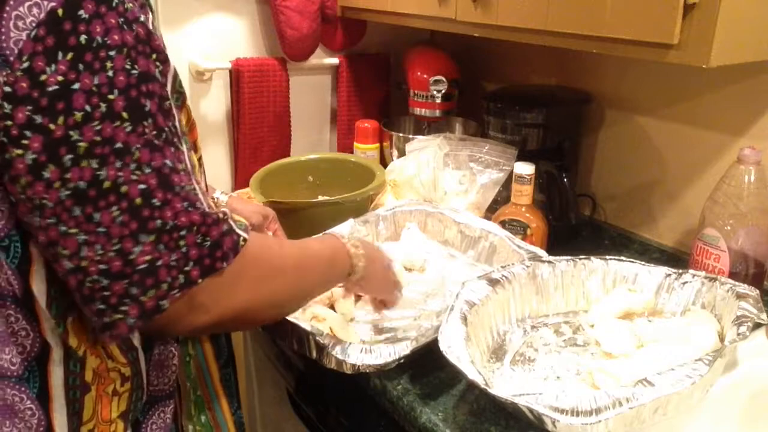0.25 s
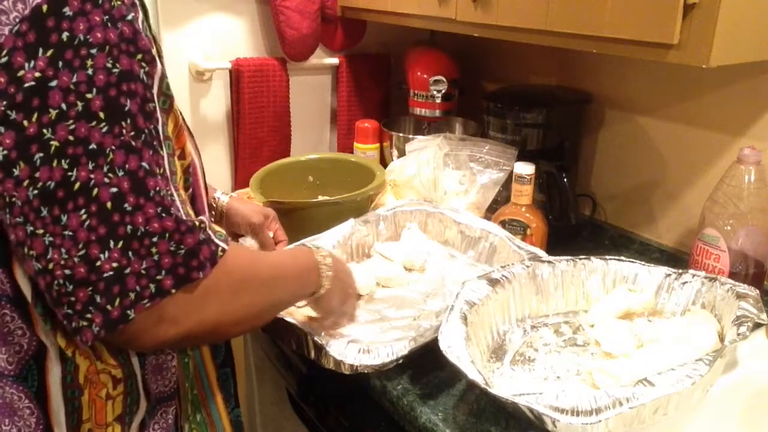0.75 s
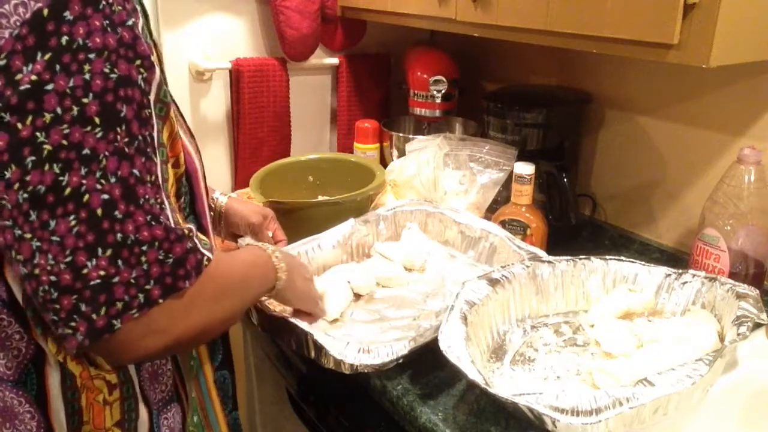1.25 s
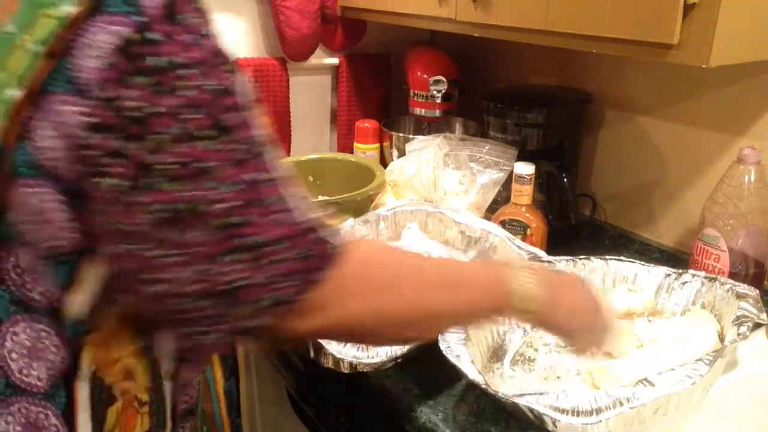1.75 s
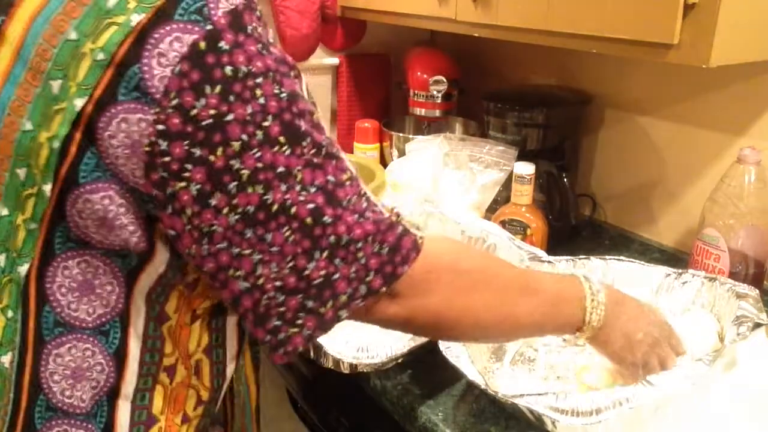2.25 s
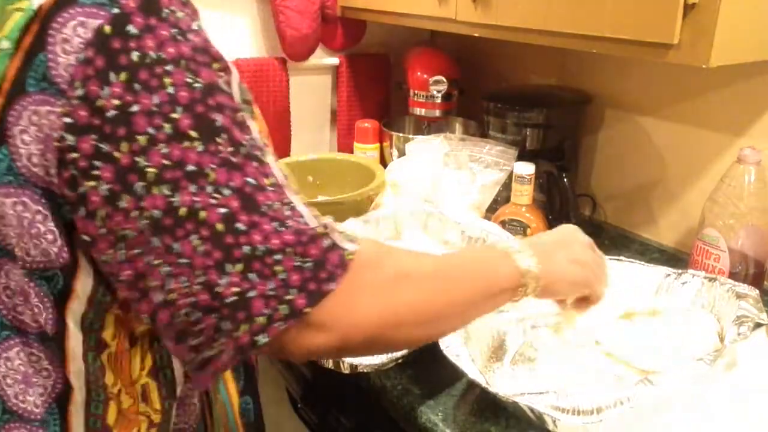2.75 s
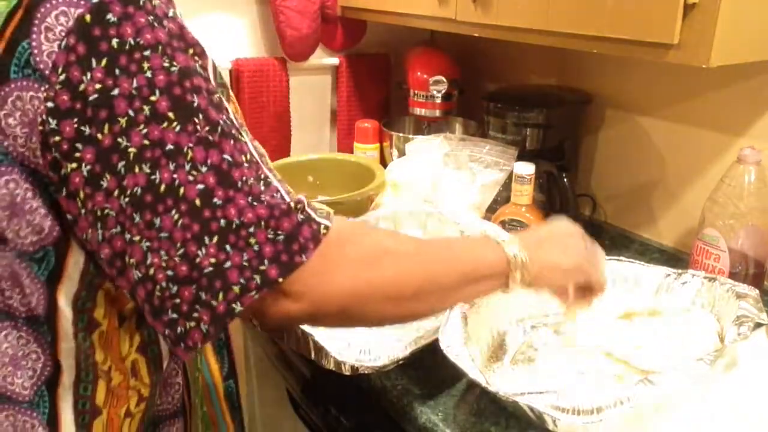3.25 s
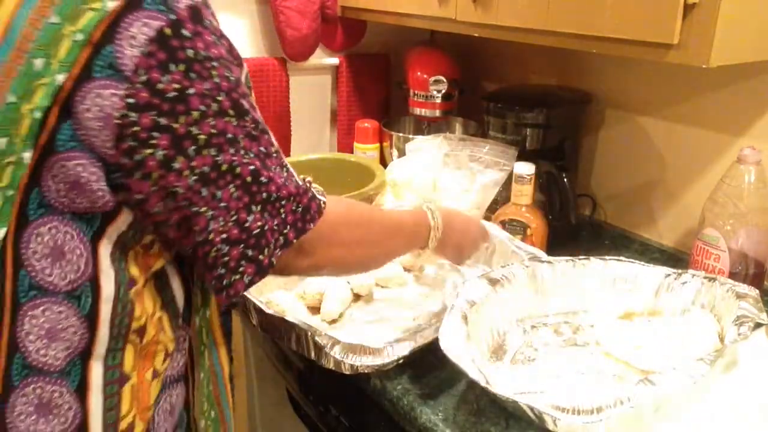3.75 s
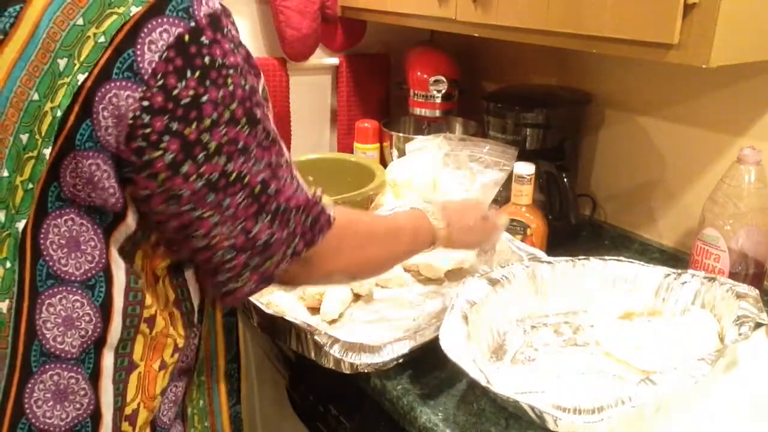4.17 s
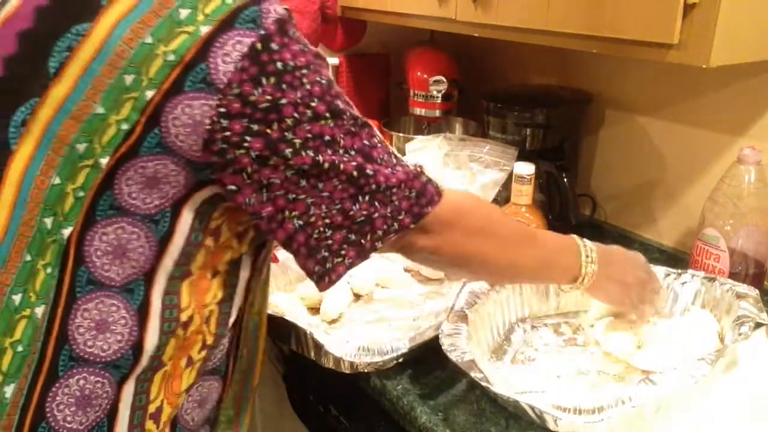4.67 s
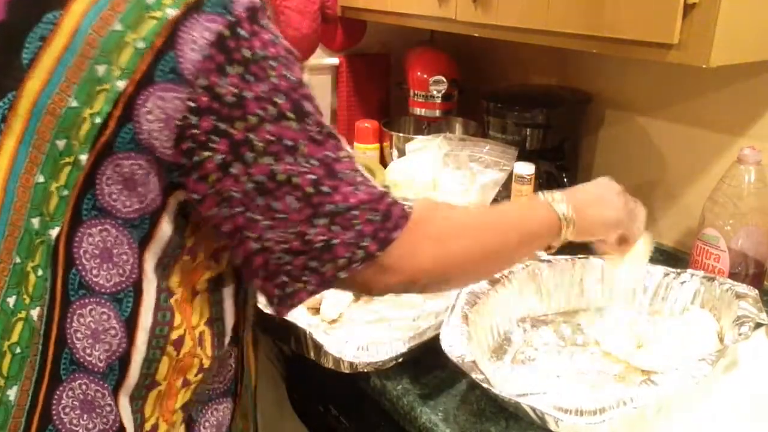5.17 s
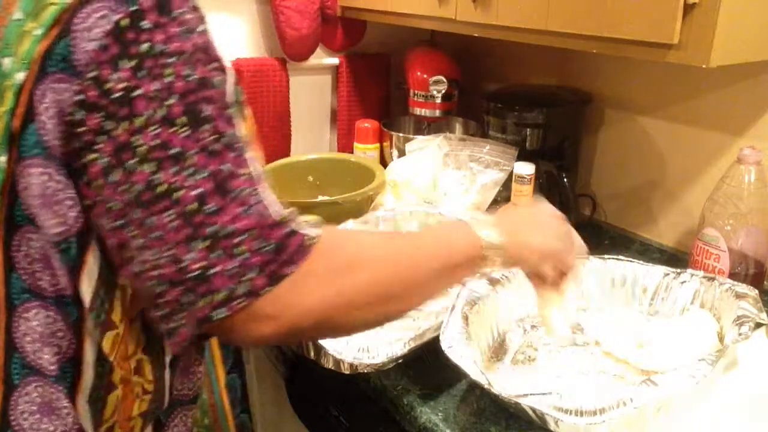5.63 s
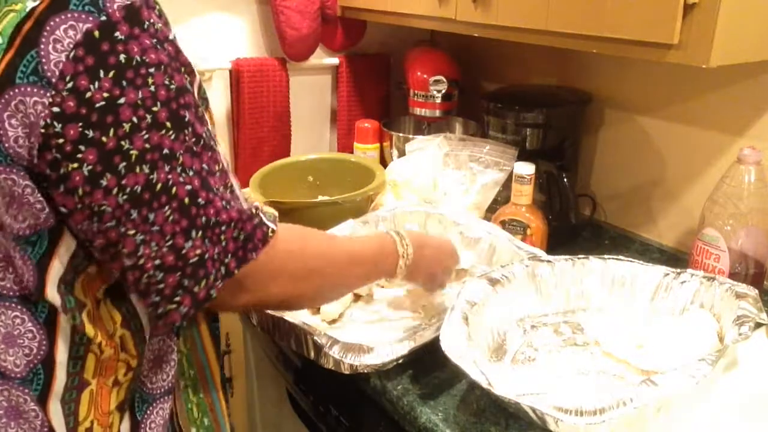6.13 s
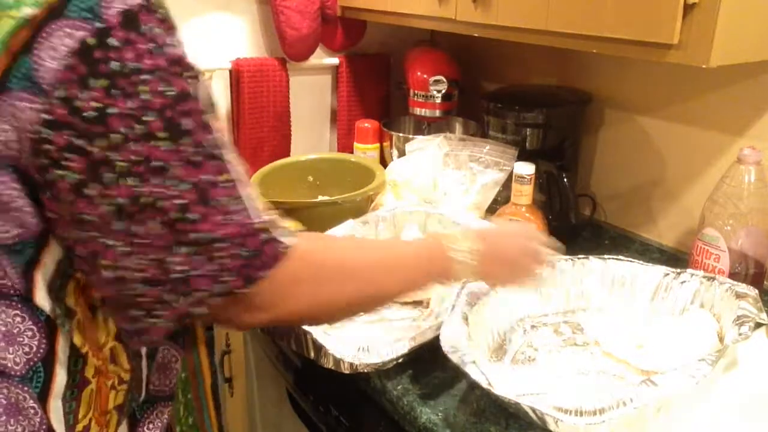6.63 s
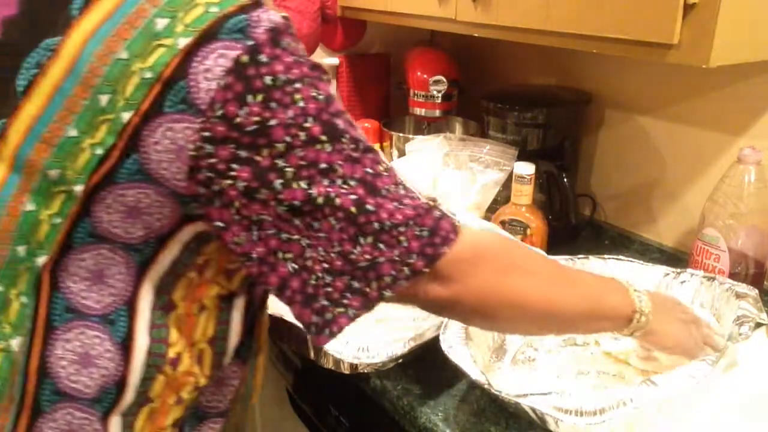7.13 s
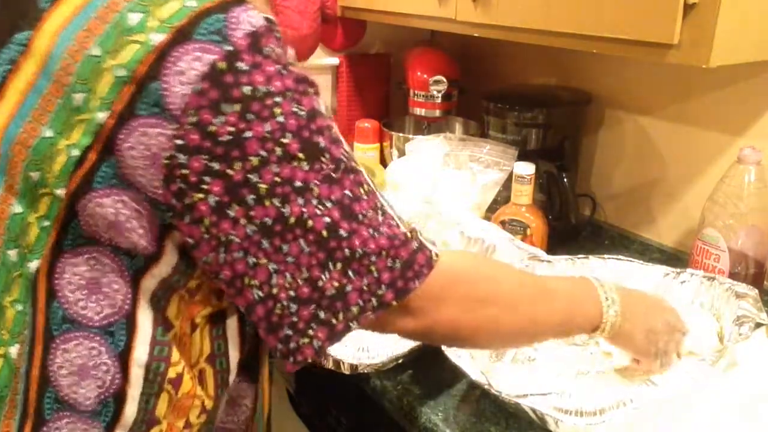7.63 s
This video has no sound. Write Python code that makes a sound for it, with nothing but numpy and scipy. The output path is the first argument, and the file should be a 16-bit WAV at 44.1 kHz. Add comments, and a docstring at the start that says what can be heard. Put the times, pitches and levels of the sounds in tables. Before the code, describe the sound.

Floured food is moved between flimsy aluminum pans: soft crackles, a single sharp clank, dull thuds and faint bangle jingles above a quiet motor hum.

```python
"""Kitchen counter: floured pieces of food are picked out of one thin foil pan, shaken off and pressed into another.
Each touch is gated noise and snaps in bands of foil; one hard knock and its rebounds ring the pan's modes.
Fingers and food swish over the ribs, flour patters, the pan floor thuds, light tinks and bangles ring.
An appliance hums and whines over moving air in the small room; both channels are alike."""
import sys
import numpy as np
from scipy import signal
from scipy.fft import rfft, irfft, next_fast_len
from scipy.io import wavfile

SR = 44100
rng = np.random.default_rng(int(sys.argv[2]) if len(sys.argv) > 2 else 0)


def unload_audio(sound):
    """Save the sound as a 16-bit wav file, at the path given as the first command line argument."""
    columns = np.transpose(np.atleast_2d(sound))
    # keep every value between -1 and 1, then stretch to whole-number steps
    steps = np.round(np.clip(columns, -1, 1) * 32767)
    wavfile.write(sys.argv[1], SR, steps.astype(np.int16))


N = 348390
TIME = np.arange(N) / SR

# food and fingers touch the foil; hardness: padded (< 0) to crisp, weight: brush on the wall to drop on the floor
# start_s, rise_s, level_db, hardness_db, weight_db
TOUCHES = [(.003,0.004,-32.5,-8,-10.5), (.219,0.0052,-42.5,-7,12.5), (.591,.008,-28.5,-1.5,6.5),
           (1.177,0.013,-25,2,2), (1.618,0.0046,-32.5,4,14), (1.6273,0.0044,-9,0,-4),
           (1.6353,0.0021,-15,13,9.5), (1.651,0.005,-15.5,-16,-3), (1.925,.004,-31.5,-8,1.5),
           (1.942,0.0092,-22,-4,-2.5), (2.006,0.0055,-30.5,-5,-8), (2.192,0.0064,-35.5,-27,0),
           (2.721,0.016,-39.5,1,1.5), (2.774,0.013,-37,4.5,-10), (2.848,0.011,-36,-2,-16),
           (3.029,.009,-46.5,12,0), (3.247,0.016,-38,5.5,3), (3.911,0.0044,-47.5,-11,15.5),
           (3.938,0.0067,-27,-13,3.5), (4.02,0.0129,-27.5,0,-5), (4.085,.012,-37.5,-8,-8),
           (4.402,0.013,-37.5,-28,-8.5), (4.677,0.014,-50,12,0), (4.8664,0.0017,-26,-34,-9.5),
           (5.005,0.0053,-36,-10,4.5), (6.221,0.012,-45,5.5,-9), (6.259,0.015,-24,5.5,-3),
           (6.294,0.0093,-23.5,8,-4.5), (6.438,0.0093,-25.5,8.5,0.5), (6.55,.012,-39.5,3.5,-3),
           (7.094,0.0085,-43.5,-43,13.5), (7.254,.012,-27,-6,3.5), (7.284,0.015,-24,-3,-17),
           (7.601,.008,-27,-8,-27), (7.702,.01,-23,-6,-25)]
# foil colour under a stroke: freq_hz, gain_db
RUB_COLOUR = [(100, -7), (300, 0), (700, 7.5), (1200, 4), (2300, 2), (4500, 1), (6200, -3.5), (8500, -0.5),
              (12000, -5), (15000, -7.5)]
# where body, rattle and crinkle are centred
TOUCH_ZONES_HZ, RUB_ZONES_HZ = [700, 2640, 9150], [720, 2950, 11100]


def from_db(db):
    """Decibels to gain."""
    return 10 ** (np.asarray(db) / 20)


def rms_one(x):
    """Scale to unit power."""
    return x / np.sqrt(np.mean(x ** 2) + 1e-20)


def at_hz(points, hz):
    """Read a spectrum on a log-frequency axis."""
    freqs_hz, levels_db = np.transpose(points)
    return np.interp(np.log(hz), np.log(freqs_hz), levels_db)


def wander(rate_hz, step=20):
    """Low-passed noise of unit power, computed every few samples and joined by lines."""
    n = next_fast_len(N // step + 2)
    lowpass = 1 / (1 + (np.fft.rfftfreq(n, step / SR) / rate_hz) ** 2)
    slow = irfft(rfft(rng.standard_normal(n)) * lowpass, n)
    return np.interp(np.arange(N) / step, np.arange(n), rms_one(slow))


def snaps(per_s, spread_db, hiss):
    """Tiny buckles of uneven size at random moments, over the hiss of finer ones."""
    sizes = from_db(spread_db * np.minimum(rng.exponential(1, N), 3))
    sizes = sizes * rng.choice([-1, 1], N)
    buckles = rms_one(sizes * (rng.random(N) < per_s / SR))
    return rms_one(buckles + hiss * rng.standard_normal(N))


def contact(level_db, hardness_db, mix_db, top_hz):
    """A harder contact reaches higher, with more crinkle and less body; returns top edge and zone levels."""
    shares = np.array([-0.068, 0, 1])   # dB per dB of hardness
    octaves = hardness_db / 32.5
    return top_hz * 2 ** octaves, level_db + np.array(mix_db) + hardness_db * shares


def strokes(rows, mix_db, top_hz, flatness):
    """Each stroke swells and fades; the flatter it is, the longer it holds its force."""
    gestures = []
    for centre_s, half_s, level_db, hardness_db in rows:
        start = max(int((centre_s - 4 * half_s) * SR), 0)
        stop = int((centre_s + 4 * half_s) * SR)
        force = np.exp(-.5 * np.abs((TIME[start:stop] - centre_s) / half_s) ** flatness)
        gestures.append((start, force, *contact(level_db, hardness_db, mix_db, top_hz)))
    return gestures


def foil(gestures, zones_hz, colour, grains, edge_count=23):
    """Gestures (start sample, force, top_hz, zone levels dB) gate grains through the bands of the sheet."""
    edges_hz = np.geomspace(130, 16000, edge_count)
    centres_hz = np.sqrt(edges_hz[:-1] * edges_hz[1:])
    gains = []
    for _, _, top_hz, levels_db in gestures:
        zone_gain = from_db(np.interp(np.log(centres_hz), np.log(zones_hz), levels_db))
        # a padded contact leaves the finest creases still
        gains.append(zone_gain / np.hypot(1, (centres_hz / top_hz) ** 4))
    out = np.zeros(N)
    for k, hz in enumerate(centres_hz):
        power = np.zeros(N)
        for (start, force, *_), gain in zip(gestures, gains):
            power[start:start + len(force)] += (gain[k] * force[:N - start]) ** 2
        band = signal.butter(2, edges_hz[k:k + 2], "band", fs=SR, output="sos")
        gated = np.sqrt(power + 1e-18) * grains[k % 2]
        out += from_db(at_hz(colour, hz)) * signal.sosfilt(band, gated)
    return out


def touches(first_snap=0.73, snap_treble_db=-8, chatter=0.75, chatter_s=0.02, chatter_treble_db=-4):
    """A touch starts with a dull snap, swells brightly as the foil gives way, and chatters out."""
    # foil colour under a touch: freq_hz, gain_db
    touch_colour = [(100, -25.5), (200, -1.5), (330, -3.5), (560, -2.5), (820, 0), (1200, 0.5), (1800, -1),
                    (2500, 1), (4500, 3), (6200, -2), (8300, 6), (12000, -3.5), (15000, -4)]
    mix_db = [8, -1, -13.5]   # body, rattle, crinkle
    t, gestures = TIME[:SR // 4], []
    upward = np.linspace(0, 1, len(TOUCH_ZONES_HZ)) ** 2
    for start_s, rise_s, level_db, hardness_db, weight_db in TOUCHES:
        top_hz, levels_db = contact(level_db, hardness_db, mix_db, top_hz=13500)
        levels_db[0] += weight_db   # weight pushes on the body of the pan
        start = max(round(start_s * SR), 0)
        u = t / max(rise_s, .001)
        snap = first_snap * np.exp(-u)
        swell = 2 * u * np.exp(-u)
        rattle = chatter * (1 - np.exp(-u)) * np.exp(-t / chatter_s)
        gestures.append((start, snap, top_hz, levels_db + snap_treble_db * upward))
        gestures.append((start, swell, top_hz, levels_db))
        gestures.append((start, rattle, top_hz, levels_db + chatter_treble_db * upward))
    grains = [snaps(per_s=2200, spread_db=4.5, hiss=0.46) for _ in range(2)]
    return foil(gestures, TOUCH_ZONES_HZ, touch_colour, grains)


def ring(clicks, hz, t60_s):
    """A damped two-pole resonator: a unit click sets a sine of height 1 ringing."""
    r, w = from_db(-60 / (t60_s * SR)), 2 * np.pi * hz / SR
    return signal.lfilter([0, np.sin(w)], [1, -2 * r * np.cos(w), r * r], clicks + 1e-18)


def knocks(scatter_db=2.0, jitter_s=.0005, rebounds=3):
    """The knock on the counter, its rebounds and the touches strike every mode, each with its own strength."""
    # pan modes: freq_hz, level_db, t60_s
    pan_modes = [(282,-12.5,0.15), (325,-9.5,0.044), (357,-22.5,0.11), (423,-4.5,0.13), (422,-13,0.15),
                 (456,-8.5,0.23), (532,-5,0.04), (596,-20,0.19), (670,-15.5,0.17), (721.5,-10,0.24),
                 (745,-28,0.16), (806,-4.5,0.121), (814,7.5,0.048), (895,-6,0.057), (992,-21.5,0.14),
                 (1000,-10.5,0.043), (1202,-24.5,0.19), (1430,-25.5,0.045), (1510,-15,0.15),
                 (1654,-16,0.12), (1670,-15.5,0.15), (1760,-31,0.079), (1890,-24.5,0.18),
                 (2086,-10.5,0.072), (2253,-14.5,0.011), (2360,-12,0.074), (2460,-16,0.052)]
    knock_s, knock_db = 1.6274, -4
    rebound_gap_s, rebound_db = .009, -17.5
    touch_ring_db = -18   # re touch level plus weight
    blows = [(knock_s, knock_db)]
    for k in range(rebounds):
        blows.append((knock_s + (k + 1) * rebound_gap_s + rng.normal(0, jitter_s), rebound_db))
    for start_s, rise_s, level_db, _, weight_db in TOUCHES:
        blows.append((start_s + rise_s / 2, level_db + weight_db + touch_ring_db))
    times_s, levels_db = np.transpose(blows)
    samples = np.round(times_s * SR).astype(int)
    scatter = rng.normal(0, scatter_db, (len(blows), len(pan_modes)))
    out = np.zeros(N)
    for k, (hz, mode_db, t60_s) in enumerate(pan_modes):
        clicks = np.bincount(samples, from_db(levels_db + mode_db + scatter[:, k]), N)
        out += (-1) ** k * ring(clicks, hz, t60_s)
    return out


def rubs(unevenness_db=1.0):
    """Fingers and food slide over the foil and catch a little on the ribs."""
    # fingers wipe over the ribbed wall: centre_s, half_length_s, level_db, hardness_db
    wall_wipes = [(.015,0.061,-41,-4.5), (.6,0.052,-37.5,1.5), (.748,0.074,-33,8), (1.288,0.048,-38.5,3.5),
                  (7.35,0.049,-42,-12), (7.52,0.053,-39,-16.5), (7.642,0.033,-28,-6), (7.755,0.046,-32,-7)]
    # a piece slides over the pan floor: centre_s, half_length_s, level_db, hardness_db
    floor_drags = [(2.053,.051,-46.5,4.5), (2.24,0.022,-52,6.5), (3.996,0.043,-39.5,-8),
                   (4.153,0.1,-56.5,-4), (4.987,0.045,-44.5,-0.5), (7.22,0.039,-46.5,4.5)]
    gestures = strokes(wall_wipes, mix_db=[-11.5, -1.5, -5.5], top_hz=10970, flatness=3.43)
    gestures += strokes(floor_drags, mix_db=[7, -1.5, -5.5], top_hz=13500, flatness=2.1)
    catch = from_db(unevenness_db * wander(45))
    grains = [catch * snaps(per_s=1800, spread_db=2.0, hiss=0.71) for _ in range(2)]
    return foil(gestures, RUB_ZONES_HZ, RUB_COLOUR, grains)


def flour():
    """Pieces are shaken; crumbs of coating patter on the foil over the hiss of fine flour."""
    # shakes: centre_s, half_length_s, level_db, hardness_db
    shakes = [(2.41,0.037,-60,5), (2.89,0.041,-49.5,8.5), (3.08,0.082,-51,3.5), (4.5,0.044,-64.5,7.5),
              (5.376,.028,-56.5,6), (5.513,0.086,-54,5), (5.665,0.039,-51,-11), (6.808,.03,-69,11)]
    gestures = strokes(shakes, mix_db=[7.5, 5, 1.5], top_hz=17000, flatness=2.3)
    crumbs = snaps(per_s=350, spread_db=1.0, hiss=0.75)
    return foil(gestures, RUB_ZONES_HZ, RUB_COLOUR, [crumbs, crumbs], edge_count=12)


def single_rings(rows, t60_s, soft_s):
    """A soft contact sets one resonance swinging briefly."""
    out, t = np.zeros(N), TIME[:SR // 3]
    for start_s, hz, level_db in rows:
        start = round(start_s * SR)
        envelope = from_db(level_db - 60 * t / t60_s) * (1 - np.exp(-t / soft_s))
        out[start:start + len(t)] += envelope * np.sin(2 * np.pi * hz * t)
    return out


def thuds():
    """The pan floor flexes at a pitch set by its load."""
    # start_s, pitch_hz, level_db
    floor_flexes = [(.223, 640, -44), (.597, 630, -38), (1.182, 416, -26.5), (1.945, 474, -32.5),
                    (3.250, 345, -31), (3.281, 492, -37.5), (3.943, 471, -33), (4.030, 460, -30.5),
                    (6.298, 342, -34), (7.098, 423, -42), (7.291, 364, -35.5)]
    return single_rings(floor_flexes, t60_s=0.18, soft_s=0.0016)


def tinks():
    """Light metallic tinks: short high sines with a soft onset."""
    # start_s, pitch_hz, level_db
    metal_taps = [(4.283, 2500, -48.5), (4.294, 3330, -49.5)]
    return single_rings(metal_taps, t60_s=0.065, soft_s=0.0016)


def bangles(rise_s=0.0088):
    """Thin hoops on the wrist chatter against each other for a moment and ring high."""
    # jingles, relative force: start_s, level_db
    jingles = [(2.850, -39.5), (3.031, -47), (5.008, -47), (5.519, -54), (7.094, -40.5)]
    # hoop resonances, relative level: freq_hz, width_hz, level_db
    hoop_modes = [(6860, 170, -38), (8200, 200, 7), (8820, 310, 5), (9400, 380, 5), (10600, 770, -1),
                  (12000, 700, -11), (13700, 530, -12)]
    force, u = np.zeros(N), TIME[:SR // 5] / rise_s
    for start_s, level_db in jingles:
        start = round(start_s * SR)
        force[start:start + len(u)] += from_db(level_db) * u * np.exp(1 - u)
    clicks = force * snaps(per_s=1500, spread_db=3, hiss=.3)
    out = np.zeros(N)
    for hz, width_hz, level_db in hoop_modes:
        b, a = signal.iirpeak(hz, hz / width_hz, fs=SR)
        out += from_db(level_db) * signal.lfilter(b, a, clicks + 1e-18)
    return 2 * out


def pan_walls(x, walls_db=-15, t60_s=0.06):
    """Sound bounces inside the pan, which ripples its spectrum."""
    t = TIME[:SR // 30]
    echoes = rng.standard_normal(len(t)) * from_db(-60 * t / t60_s) * (t > .0005)
    echoes = signal.sosfilt(signal.butter(2, 1500, "high", fs=SR, output="sos"), echoes)
    gain = from_db(walls_db)
    bounced = signal.oaconvolve(x, echoes / np.linalg.norm(echoes))[:N]
    return (x + gain * bounced) / np.hypot(1, gain)


def kitchen(x, treble_from_hz=3500, first_echo_s=0.0025):
    """Dense reflections from cabinets and walls; the treble dies sooner."""
    low_t60_s, treble_t60_s, room_db = 0.29, 0.12, -8.5
    t = TIME[:SR // 2]
    echoes = rng.standard_normal(len(t)) * (t > first_echo_s)
    lows = signal.sosfilt(signal.butter(1, treble_from_hz, fs=SR, output="sos"), echoes)
    tail = lows * from_db(-60 * t / low_t60_s)
    tail += (echoes - lows) * from_db(-60 * t / treble_t60_s)
    return from_db(room_db) * signal.fftconvolve(x, tail / np.linalg.norm(tail))[:N]


def appliance(hum_hz=235.2, phase_waver_rad=0.32, swell_db=2, air_db=-55):
    """A motor hum of drifting level, narrow tones that waver and swell, and moving air."""
    # main hum, RMS: time_s, level_db
    hum_level = [(0.0, -47), (0.04, -49.5), (2.31, -47.5), (5.44, -52.5), (7.63, -51), (7.9, -54)]
    # narrow wavering tones: freq_hz, width_hz, level_db
    whines = [(165.4, 8.2, -63), (240.7, 24, -61), (837, 8, -64), (2340, 30, -76), (2444, 24, -75)]
    # air spectrum, relative density: freq_hz, level_db_per_hz
    air_colour = [(30, -34.5), (80, -37), (120, -10), (160, 0), (200, -4), (280, 3.5), (400, -11),
                  (650, -8), (1000, -6), (1250, -12.5), (1900, -23), (3000, -21), (5000, -28), (10000, -26),
                  (15000, -29.5)]
    hum_gain = from_db(np.interp(TIME, *np.transpose(hum_level))) * np.sqrt(2)
    out = hum_gain * np.sin(2 * np.pi * hum_hz * TIME + phase_waver_rad * wander(2))
    for hz, width_hz, level_db in whines:
        phase = 2 * np.pi * hz * TIME
        swell = from_db(level_db + swell_db * wander(0.75))
        out += swell * (wander(width_hz) * np.cos(phase) + wander(width_hz) * np.sin(phase))
    air_gain = from_db(at_hz(air_colour, np.fft.rfftfreq(N, 1 / SR) + 1))
    air = irfft(rfft(rng.standard_normal(N)) * air_gain, N)
    return out + from_db(air_db) * rms_one(air)


def scene():
    """The pans in their room, over the appliance; both channels alike."""
    crinkles = pan_walls(touches() + rubs() + flour()) + bangles()
    rings = knocks() + thuds() + tinks()
    # the rings feed the room far less than the crinkles do
    pans = crinkles + rings + kitchen(crinkles + from_db(-18.5) * rings)
    # the pans and their room are thinned below about 240 Hz
    pans = signal.sosfilt(signal.butter(2, 242, "high", fs=SR, output="sos"), pans)
    return np.tile(pans + appliance(), (2, 1))


def record(dry, cutoff_hz=15400):
    """The hardest peaks are rounded and the top is cut."""
    rounded = 2 * np.tanh(dry / 2)
    return signal.sosfilt(signal.ellip(10, .1, 80, cutoff_hz, fs=SR, output="sos"), rounded)


dry = scene()
out = record(dry)
unload_audio(out)
```